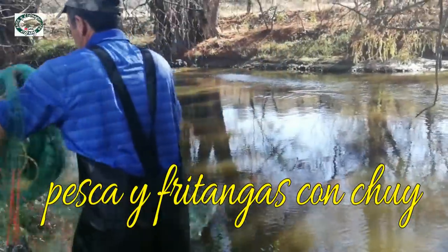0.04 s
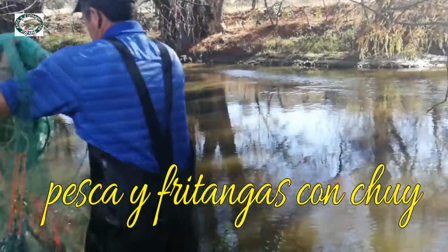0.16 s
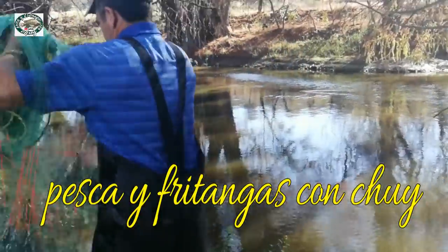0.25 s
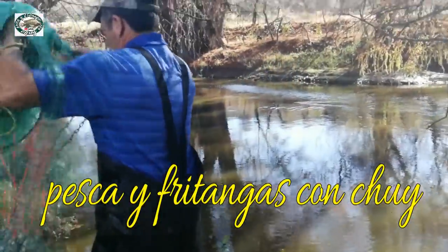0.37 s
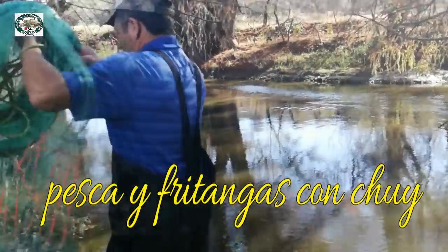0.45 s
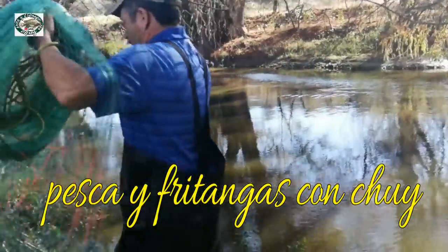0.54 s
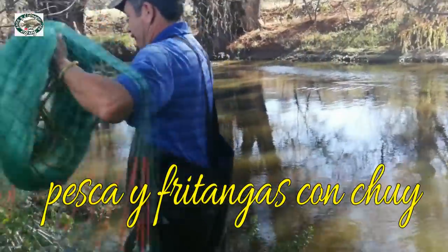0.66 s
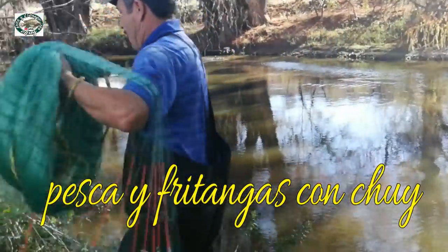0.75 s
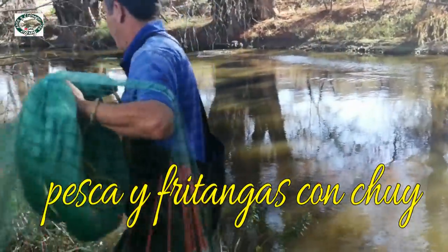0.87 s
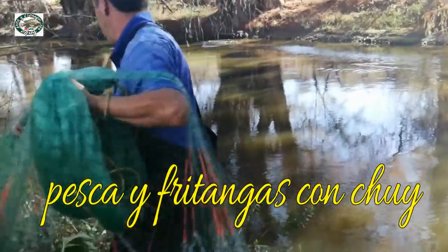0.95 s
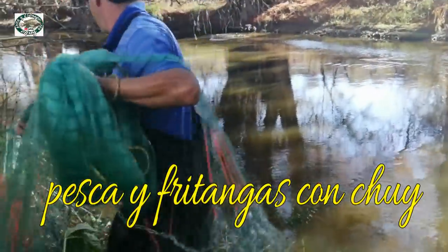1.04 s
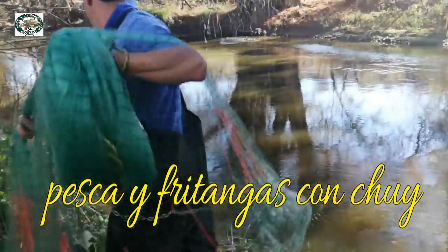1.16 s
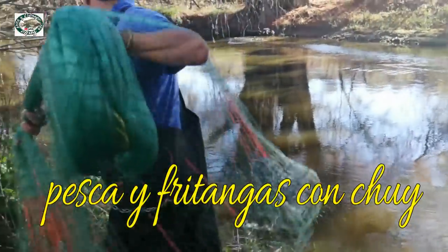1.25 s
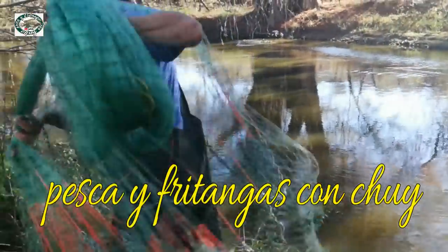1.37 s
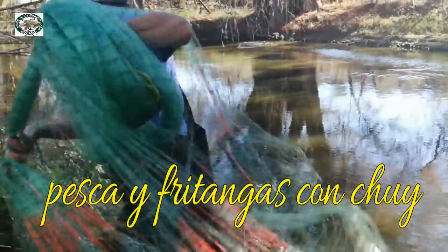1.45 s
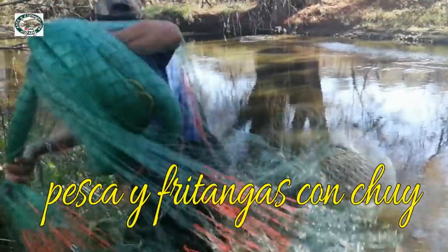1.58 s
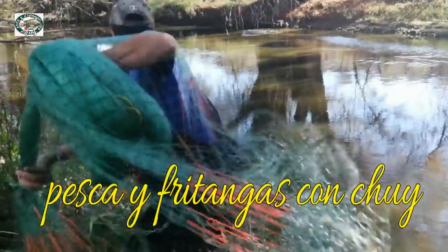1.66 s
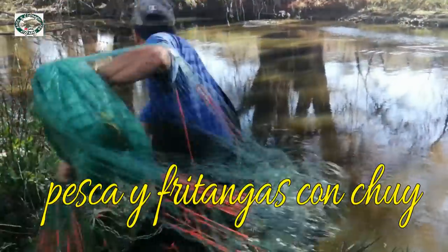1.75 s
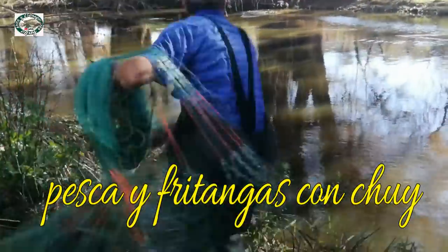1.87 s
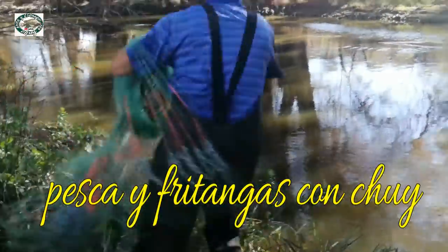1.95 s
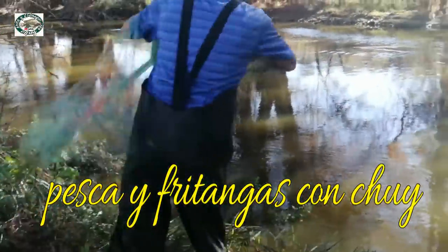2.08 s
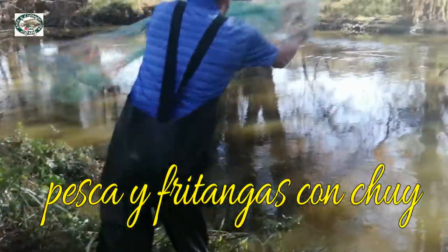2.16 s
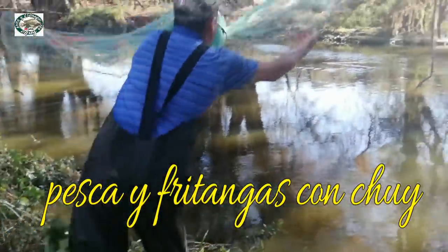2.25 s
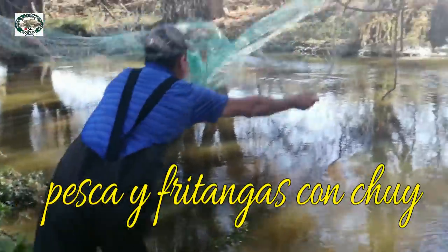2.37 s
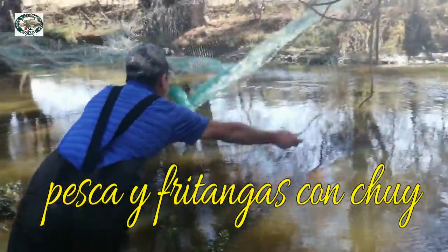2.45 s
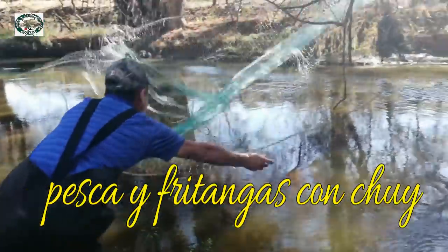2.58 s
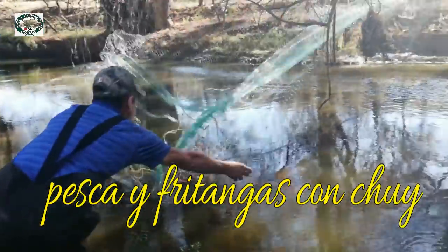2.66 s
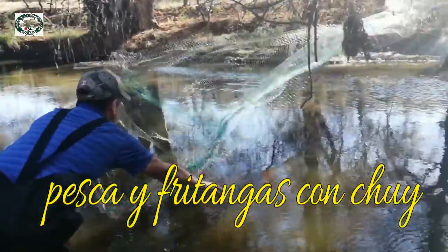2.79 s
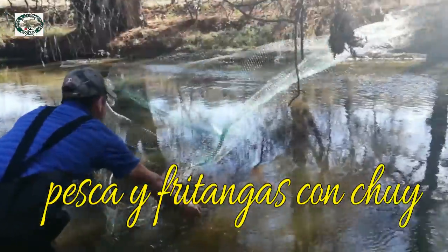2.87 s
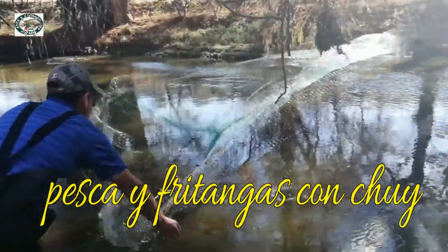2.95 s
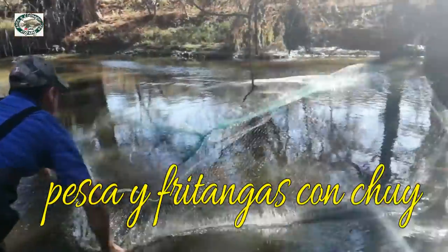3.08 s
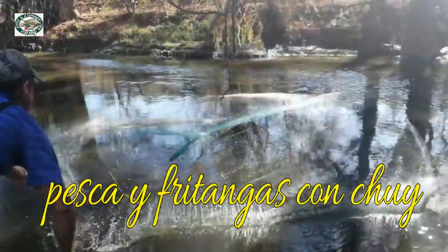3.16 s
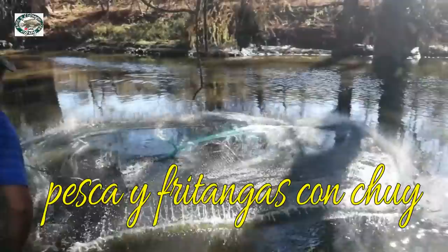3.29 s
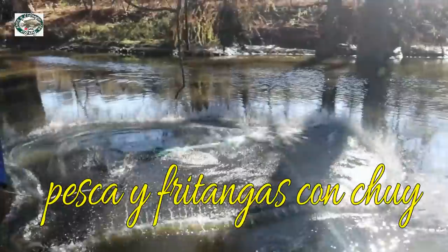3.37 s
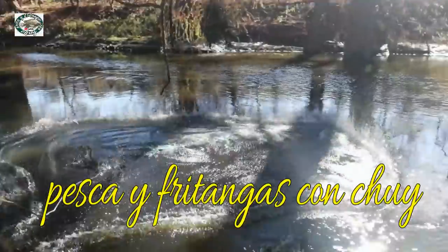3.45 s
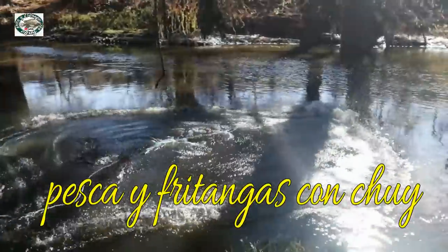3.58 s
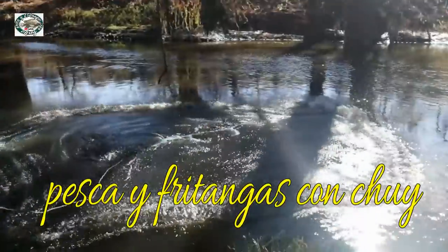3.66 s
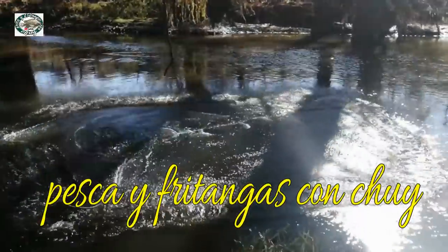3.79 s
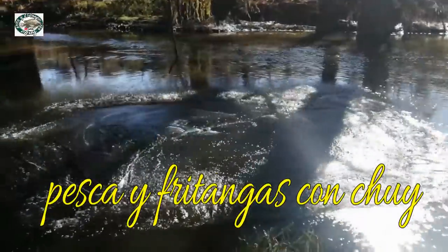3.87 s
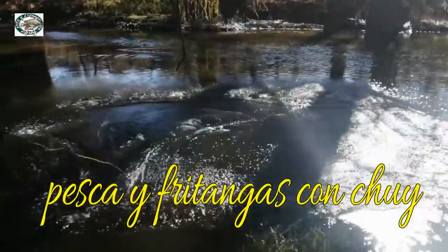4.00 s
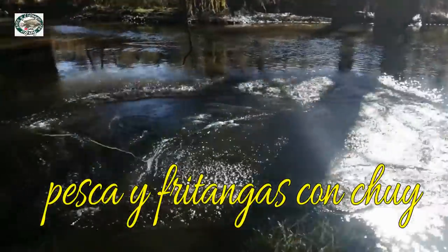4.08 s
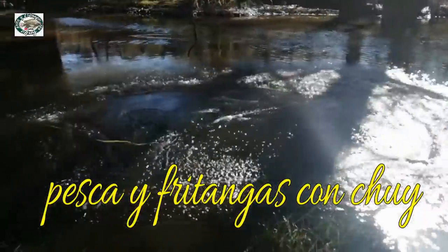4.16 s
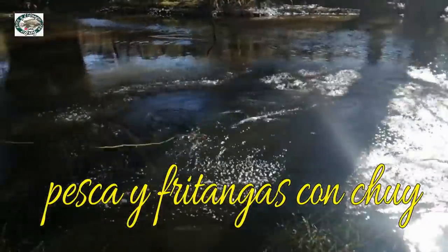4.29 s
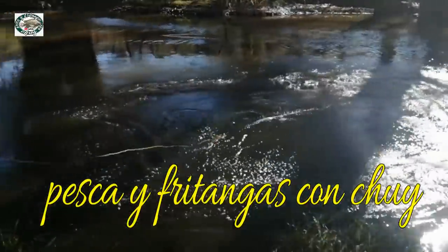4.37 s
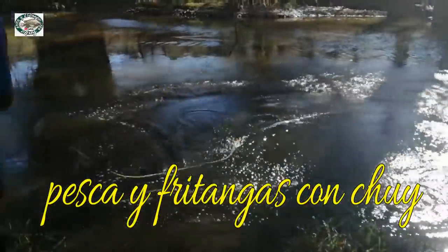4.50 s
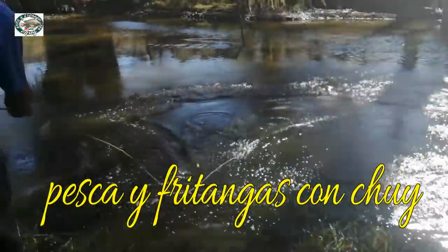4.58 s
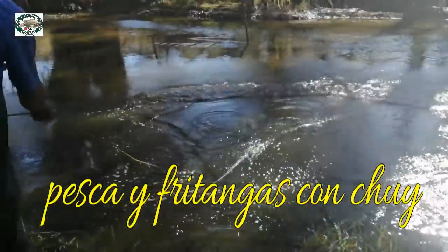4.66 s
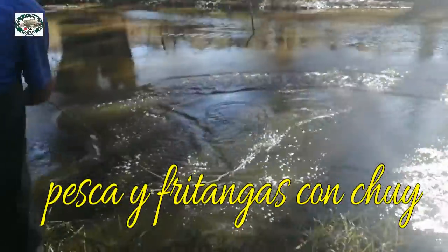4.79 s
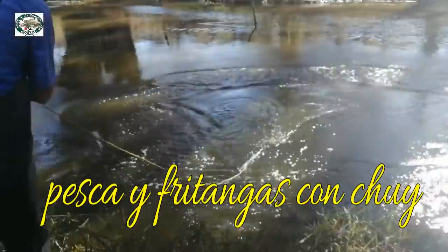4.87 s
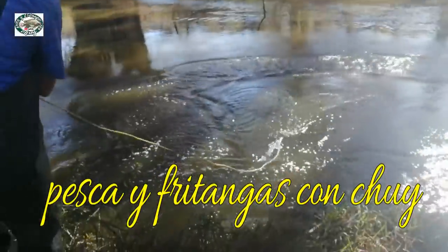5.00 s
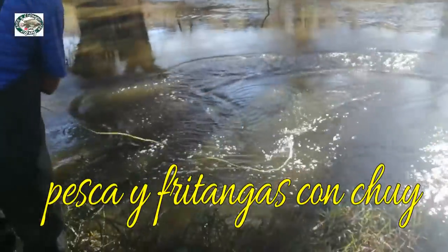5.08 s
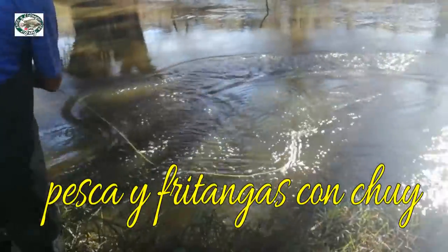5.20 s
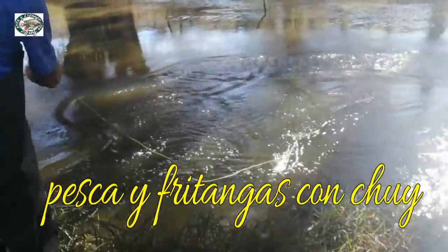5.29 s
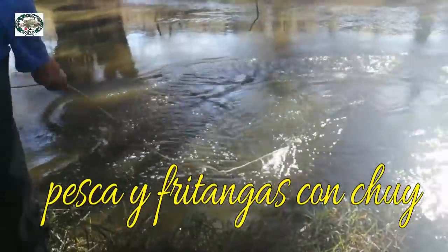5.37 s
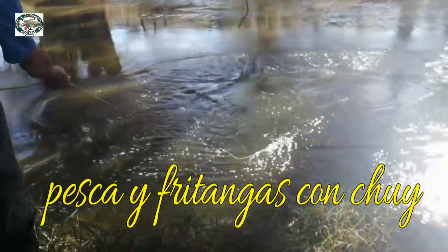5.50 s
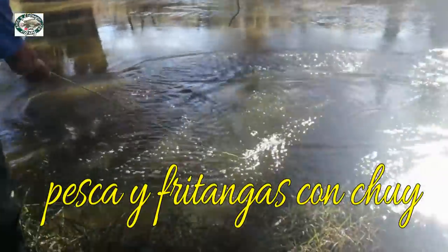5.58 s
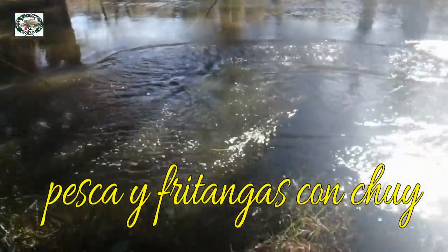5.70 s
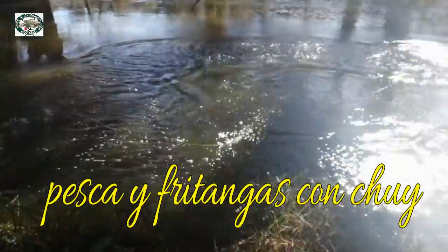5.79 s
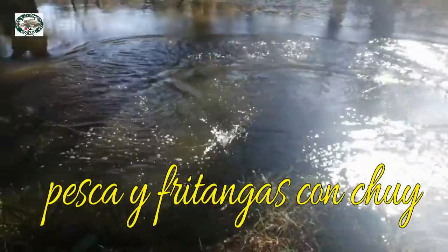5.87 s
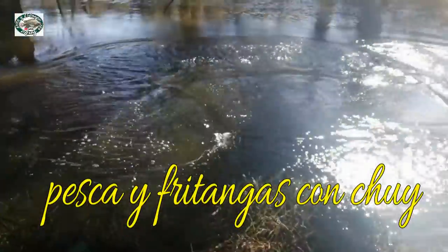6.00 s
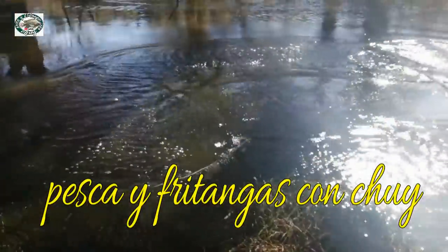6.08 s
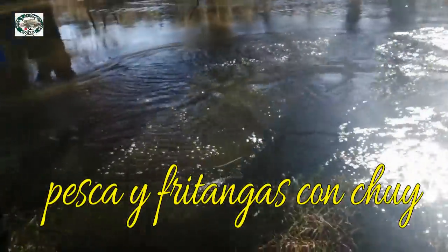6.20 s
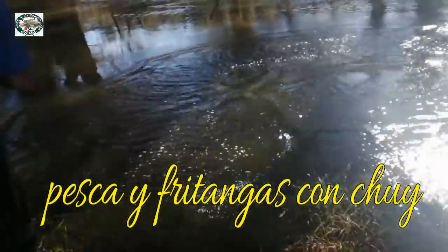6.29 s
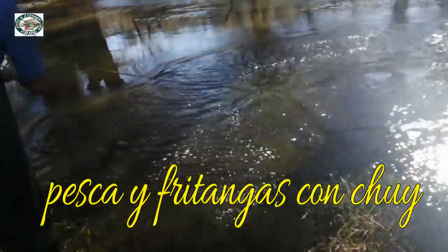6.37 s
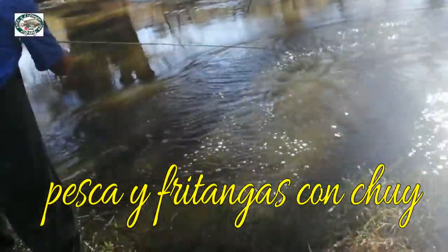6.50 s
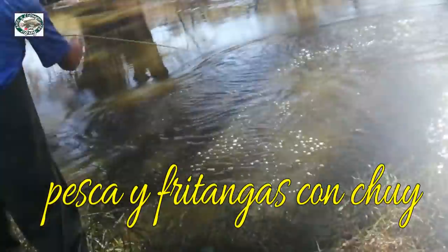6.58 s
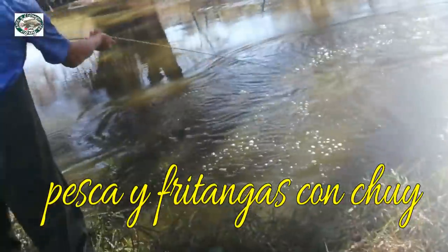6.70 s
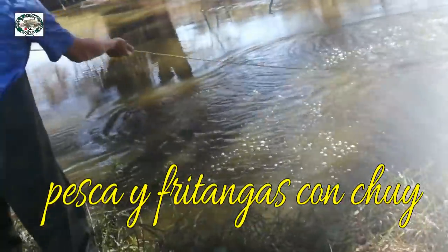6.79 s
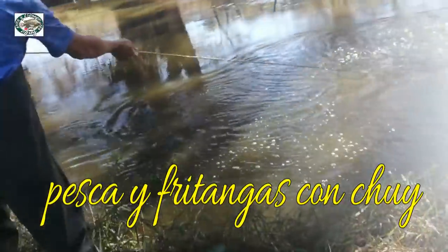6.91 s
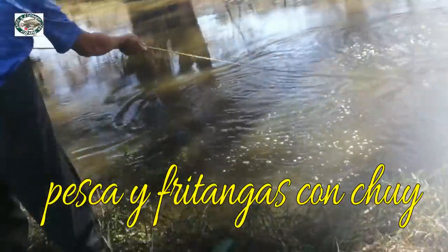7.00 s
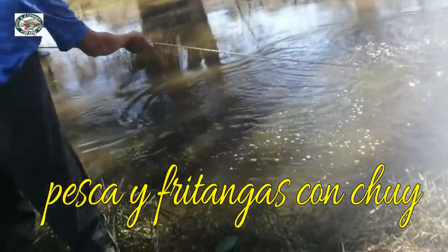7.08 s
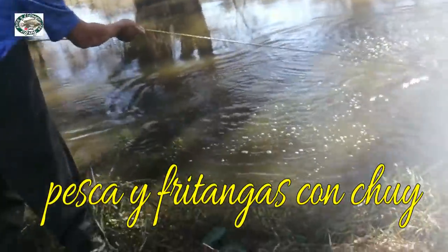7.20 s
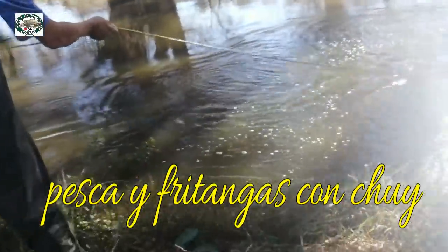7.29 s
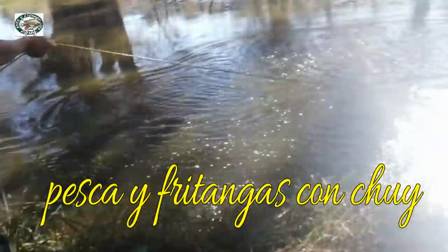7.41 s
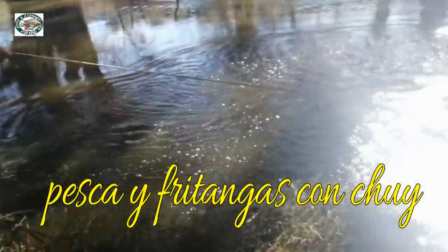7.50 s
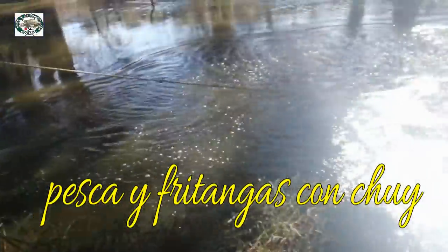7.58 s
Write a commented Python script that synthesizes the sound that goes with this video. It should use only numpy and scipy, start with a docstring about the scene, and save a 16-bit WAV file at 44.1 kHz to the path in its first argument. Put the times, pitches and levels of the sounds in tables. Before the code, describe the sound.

Mesh and cloth rub in bursts with sharp sinker ticks, then a wide fizzing splash lands on water, followed by faint rustles and drips.

```python
"""A cast net is gathered, swung and thrown from a river bank by a fisherman, who then draws in the hand line.
Mesh, grass and cloth are shaped noise impulses under gains for each movement; contacts are damped ticks.
The flying net is a gliding noise band; its landing is a cloud of damped bubbles with spray and deep plunges.
Single bumps, bubbles and drips are short damped sounds; river and far drone are steadily wavering filtered noise."""
import sys
import numpy as np
from scipy import signal
from scipy.fft import rfft, irfft, next_fast_len
from scipy.io import wavfile
from scipy.ndimage import uniform_filter1d

SR = 44100
rng = np.random.default_rng(int(sys.argv[2]) if len(sys.argv) > 2 else 0)


def transcribe(signal):
    """Save signal, clipped to [-1, 1], as a 16-bit WAV file at the path in sys.argv[1]."""
    frames = np.atleast_2d(signal).T
    limited = np.clip(frames, -1, 1)
    pcm = np.round(limited * 32767).astype(np.int16)
    wavfile.write(sys.argv[1], SR, pcm)


N = 337365
TIME = np.arange(N) / SR
STROKE_DEPTH_DB = 20  # the fade that every rise and fall time refers to
LANDING_S = 2.992


def undb(db):
    """Logarithmic level: 20 dB are a factor of ten in amplitude."""
    return 10 ** (np.asarray(db) / 20)


def unit(x):
    """Normalisation: scale to a root mean square of 1."""
    return x / np.sqrt(np.mean(x ** 2))


def pan(db):
    """Level difference between the ears: left and right gains of equal total power."""
    return unit(undb(np.array([[db], [-db]]) / 2))


def add(out, s, x):
    """Superposition: mix a short sound in at time s."""
    i = max(int(s * SR), 0)
    out[:, i:i + x.shape[1]] += x[:, :max(N - i, 0)]


def colour(x, points):
    """Spectral shaping: weight each frequency by a (Hz, dB) curve, interpolated over log frequency."""
    hz, db = np.transpose(points)
    size = next_fast_len(N)
    f = np.maximum(np.arange(size // 2 + 1) * SR / size, 1)
    gain = undb(np.interp(np.log(f), np.log(hz), db))
    return irfft(rfft(x, size) * gain, size)[..., :N]


def band(x, hz, octaves):
    """Resonance: a gentle band-pass, its edges kept within the audible range."""
    half_width = 2 ** (octaves / 2)
    edges = np.clip([hz / half_width, hz * half_width], 10, [.4 * SR, .45 * SR])
    return signal.sosfilt(signal.butter(1, edges, "band", fs=SR, output="sos"), x)


def walk(rate):
    """Random modulation: smoothed steps at a rate in Hz, with rms 1."""
    k = int(SR / rate)
    steps = np.repeat(rng.standard_normal(N // k + 1), k)
    return unit(uniform_filter1d(steps, k)[:N])


def impacts(rate, spread_db, lag_s, scatter_s):
    """Shot noise: random impulses of uneven size, each reaching the two channels at its own lag."""
    chance = rng.standard_normal((int(rate * N / SR), 3))
    at = rng.integers(0, N, len(chance))
    size = np.sign(chance[:, 0]) * undb(spread_db * np.minimum(chance[:, 1], 2.5))
    lag = ((lag_s + scatter_s * chance[:, 2]) * SR).astype(int)
    return np.array([np.bincount((at + lag) % N, size, N), np.bincount(at, size, N)])


def smear(x, decay_s, tail_db):
    """Exponential decay: give every impulse its own short noisy tail."""
    keep = np.exp(-2 / (decay_s * SR))
    energy = signal.lfilter([1 - keep], [1, -keep], x ** 2 + 1e-18)
    return x + undb(tail_db) * np.sqrt(energy) * rng.standard_normal(x.shape)


def shift(x, low_hz, high_hz, rate, depth_db, count):
    """Spectral fluctuation: each band swells and sinks on its own."""
    centres = np.geomspace(low_hz, high_hz, count)
    octaves = np.log2(centres[1] / centres[0])
    return x + sum(band(x, hz, octaves) * (undb(depth_db * np.clip(walk(rate), -2, 2)) - 1)
                   for hz in centres)


def reflect(x, decay_s, wet_db):
    """Diffuse reflection: add a decaying noise tail, different on each side."""
    t = TIME[:SR // 2]
    tail = rng.standard_normal((2, len(t))) * np.exp(-t / decay_s)
    tail /= np.sqrt(np.sum(tail ** 2, axis=1, keepdims=True))
    return x + undb(wet_db) * signal.fftconvolve(x, tail, axes=1)[:, :N]


def stroke(peak_s, rise_s, fall_s):
    """Friction grows with speed: the gain of one movement that gathers speed, peaks and slows."""
    roundness = 1.406  # 1 = pointed peak, 2 = bell
    away = np.maximum((peak_s - TIME) / rise_s, (TIME - peak_s) / fall_s)
    return undb(-STROKE_DEPTH_DB * np.minimum(away, 10) ** roundness)


# Movements of arms, net and boots: gathering, lifting, back swing, throw, stepping back, taking up the line,
# pulling the net, hauling. Each row: peak in seconds, rise and fall in seconds to fade by STROKE_DEPTH_DB,
# coarse rubbing in dB, fine hiss of mesh and grass in dB, flapping of cloth in dB.
MOVEMENTS = [(0.03, 0.21, .26, -53.5, -54, -64), (0.355, .035, .14, -50.5, -55, -53),
             (0.74, 0.2, 0.3, -57, -61.5, -62.5), (1.305, 0.2, 0.11, -39.5, -45, -52),
             (1.36, .28, 0.13, -49.5, -43.5, -73), (1.45, 0.072, 0.11, -43.5, -44, -57.5),
             (1.659, 0.07, 0.061, -63, -42, -45), (1.8, 0.17, 0.23, -52.5, -48.5, -53),
             (1.98, 0.11, 0.23, -33, -40.5, -46), (2.06, 0.15, 0.18, -43, -42.5, -39.5),
             (2.33, 0.31, 0.18, -55.5, -56, -56.5), (2.62, 0.45, .11, -59, -51.5, -68.5),
             (3.985, 0.079, 0.054, -43.5, -38.5, -53.5), (4.48, 0.17, 0.19, -58, -43.5, -53.5),
             (4.68, 0.31, 0.095, -59.5, -47.5, -65), (4.92, 0.74, 1, -81, -59.5, -76),
             (5.52, 0.28, 0.14, -55.5, -53, -62.5), (5.82, 0.17, 0.36, -56, -56, -63),
             (6.23, 0.24, 0.2, -50.5, -66, -68), (6.33, 0.24, 0.27, -44.5, -44, -54.5),
             (6.47, 0.14, 0.14, -52.5, -48, -62), (6.684, 0.045, 0.018, -66, -50.5, -66),
             (6.93, 0.37, .26, -81, -62.5, -81), (7.186, 0.059, 0.07, -50, -45, -68)]
# The faint rustle between movements. The row: rubbing in dB, hiss in dB, flapping in dB.
RESTING_DB = (-62.5, -67, -74.5)
REST_END_S, REST_FADE_S = 6.95, 1.0  # from the end on, down by STROKE_DEPTH_DB per fade time
STILL_S, STILL_LENGTH_S = 3.52, 0.66  # he holds still: the resting rustle dips to nothing
FLAP_BRIEFNESS = 1.19  # flapping fades faster than rubbing on both sides of a peak


def effort():
    """Incoherent sources add in power: gains of rubbing, hiss and flapping over the resting rustle."""
    resting = undb(-STROKE_DEPTH_DB * np.maximum(TIME - REST_END_S, 0) / REST_FADE_S)
    resting *= 1 - np.exp(-((TIME - STILL_S) / STILL_LENGTH_S) ** 4)
    power = np.outer(undb(RESTING_DB), resting) ** 2
    for peak_s, rise_s, fall_s, rub_db, hiss_db, flap_db in MOVEMENTS:
        speed = stroke(peak_s, rise_s, fall_s)
        flapping = undb(flap_db) * speed ** FLAP_BRIEFNESS
        power += np.array([undb(rub_db) * speed, undb(hiss_db) * speed, flapping]) ** 2
    return np.sqrt(power)


# Spectra of coarse rubbing, fine hiss and flapping cloth. Each row: frequency in Hz, relative gain in dB.
RUB_SPECTRUM = [(300, -13), (600, -15), (880, -3), (1200, -4), (1500, -4), (1950, -0.5), (2550, -1.5),
                (3300, -4.5), (4500, -7.5), (7000, -12.5), (12000, -44)]
HISS_SPECTRUM = [(1200, -65), (2500, 2.5), (3500, -2.2), (5500, 1.5), (6500, -3), (7500, 1), (8700, -4),
                 (10800, 3), (12500, -5), (15000, -13)]
FLAP_SPECTRUM = [(40, -7), (90, -3), (200, 1.5), (290, 0), (360, -0.5), (520, -16.5), (900, -11.5),
                 (1300, -35), (2500, -51)]


def handling():
    """Stick-slip friction: countless tiny slips of knots and blades in uneven surges, over fluttering cloth."""
    rub_gain, hiss_gain, flap_gain = effort()
    rub_slips = impacts(rate=2200, spread_db=6.0, lag_s=.00027, scatter_s=.00008)
    rub = colour(smear(rub_slips, decay_s=.0066, tail_db=2.0), RUB_SPECTRUM)
    rub = shift(rub, 900, 3600, rate=25, depth_db=2.5, count=5)
    hiss_slips = impacts(rate=2500, spread_db=5.5, lag_s=.0002, scatter_s=.00034)
    hiss = colour(smear(hiss_slips, decay_s=.0072, tail_db=6.5), HISS_SPECTRUM)
    flaps = impacts(rate=300, spread_db=4.5, lag_s=.00005, scatter_s=.0004)
    flap = colour(smear(flaps, decay_s=.014, tail_db=-10), FLAP_SPECTRUM)
    friction = unit(rub) * rub_gain * pan(1.6) + unit(hiss) * hiss_gain * pan(0.24)
    surges = undb(1.0 * walk(45))
    return friction * surges + unit(flap) * flap_gain


# Spectrum of the river. Each row: frequency in Hz, relative gain in dB.
RIVER_SPECTRUM = [(20, -1.5), (80, -2.5), (120, -9), (200, -14), (320, -22.5), (520, -26), (900, -30.5),
                  (1400, -22.5), (2100, -18), (3500, -24), (7000, -29.5), (11000, -30), (15000, -45)]
RIVER_DB = -61.5


def river():
    """Coherence: a low outdoor rumble common to both sides, and a thin wavering wash independent on each."""
    common, apart = rng.standard_normal(N), rng.standard_normal((2, N))
    bass = signal.sosfilt(signal.butter(1, 450, fs=SR, output="sos"), common)
    wash = signal.sosfilt(signal.butter(1, 450, "high", fs=SR, output="sos"), apart)
    wavering = bass * undb(0.92 * walk(8.2)) + wash * undb(2.6 * walk(9))
    return undb(RIVER_DB) * unit(colour(wavering, RIVER_SPECTRUM))


# A faint low drone from far away. Each row: time in seconds, level in dB.
DRONE_LEVEL = [(0, -72), (5.0, -71), (5.5, -63), (6.5, -61), (7.6, -74)]


def drone():
    """Narrow-band noise beats at random: a wavering hum at 79.7 Hz that carries over the water."""
    hum = band(band(rng.standard_normal(N), 79.7, 0.12), 79.7, 0.12)
    s, db = np.transpose(DRONE_LEVEL)
    return unit(hum) * undb(np.interp(TIME, s, db))


# Sinkers clacking, dry stalks snapping, and the net's first tick on the water.
# Each row: start in seconds, tick level in dB over its first 6 ms, centre in Hz, width in octaves,
# decay in seconds, left minus right in dB, relative knock level in dB.
CONTACTS = [(0.124, -41, 1900.0, 4.2, 0.00033, 16, -37.5), (0.1416, -36, 8100.0, 0.8, 0.0065, 1, -51),
            (0.298, -46, 4970, 0.5, 0.003, 7, -64), (0.3344, -46, 2400.0, 1.9, 0.0019, 4, -49),
            (1.249, -35, 2800.0, 3.9, 0.0049, 1, -40), (1.3812, -33.5, 8300.0, 1.9, 0.0037, -6, -43.5),
            (1.4141, -31.5, 5100.0, 2.1, 0.0025, -1, -59), (1.5862, -30, 3600, 0.72, 0.0059, -1, -44.5),
            (1.596, -24, 3700, 1.1, 0.0019, -0.5, -60), (1.7578, -41, 3400.0, 0.77, 0.0012, 1.0, -63),
            (1.7676, -37.0, 3700.0, 2.2, 0.0012, 1, -53), (1.799, -42, 2800.0, 1.5, 0.0015, -2, -58),
            (1.8257, -30, 5200, 0.7, 0.0012, -2, -52), (1.8271, -25.5, 3650, 0.45, 0.0011, 3, -39.5),
            (1.8774, -37, 4650, 4.3, 0.0016, 2, -48), (1.9213, -31, 4630, 3.6, 0.0069, -2, -39),
            (2.1956, -29.5, 8240, 0.95, 0.0016, 0, -62), (2.4024, -41.5, 4400.0, 3.6, 0.0032, 5, -70),
            (2.996, -44, 3000, 1.3, .006, 2, -75), (3.9923, -33.5, 9600, 2.2, 0.0022, -5, -61),
            (4.265, -55, 6000, 1.6, .003, -5, -78), (5.2212, -53, 9300, 0.59, 0.0015, -4, -85),
            (5.82, -37.5, 7200.0, 2.8, 0.0012, 0, -70), (6.2827, -35.5, 5600.0, 2.1, 0.0033, 2, -59),
            (6.3474, -21.5, 3500, 3.0, 0.0034, -1, -41), (6.55, -32, 2400, 0.45, 0.002, -1.5, -49),
            (6.567, -48, 2200, 0.7, 0.009, 0, -64), (6.605, -49, 6000, 2.2, 0.002, -2, -72),
            (6.743, -51, 5500, 1.7, .0015, -4, -76), (6.7576, -42.5, 5100, 1.4, 0.0032, -2, -76),
            (6.801, -44, 5560, 1.2, 0.013, -1, -74.0), (6.8377, -46.5, 4200.0, 1.3, 0.0019, -3, -69),
            (7.0791, -46, 3500.0, 3.6, 0.0048, 4, -54.5), (7.138, -31, 8100, 0.99, 0.0078, 1, -48),
            (7.185, -39, 4500.0, 2.5, 0.0012, 5, -68), (7.314, -52, 3300.0, 0.97, 0.0011, 0, -80),
            (7.338, -45.5, 3480, 1.4, 0.0025, 1, -57.5)]
# Spectrum of the knock. Each row: frequency in Hz, relative gain in dB.
KNOCK_SPECTRUM = [(60, -17), (150, 1), (300, 4), (550, -7.5), (1100, 4), (1900, 2.5), (4500, -46)]


def clicks():
    """Impact excitation: a sharp tick and rattle in a contact's own resonance, over a short push or knock."""
    ticks, knocks, t = np.zeros((2, N)), np.zeros((2, N)), TIME[:SR // 10]
    highpass = signal.butter(2, 1200, "high", fs=SR, output="sos")
    for s, db, hz, octaves, decay_s, pan_db, knock_db in CONTACTS:
        decay = np.exp(-t / decay_s) + undb(-9) * np.exp(-t / .009)  # a weaker second decay is added
        rattle = rng.standard_normal((2, len(t))) * decay
        rattle[:, 2] += 4.5  # one sharp spike at the very start
        ring = signal.sosfilt(highpass, band(rattle, hz, octaves))
        ring /= np.sqrt(np.mean(ring[:, :int(.006 * SR)] ** 2))
        add(ticks, s, undb(db) * ring * pan(pan_db))
        add(knocks, s, undb(knock_db) * pan(pan_db / 2))  # a single impulse
    knocks = undb(31.5) * colour(smear(knocks, decay_s=.0022, tail_db=2.5), KNOCK_SPECTRUM)
    return reflect(ticks + knocks, decay_s=.044, wet_db=-15.0)


# Dull bumps of boots and cloth, and gulps of water.
# Each row: start in seconds, peak in dB before reflections, pitch in Hz, decay in seconds.
BUMPS = [(.139, -37, 90, 0.006), (0.829, -50, 260, 0.0052), (1.503, -40.5, 320, 0.0064),
         (1.564, -37.5, 318, 0.0041), (1.659, -35, 250, 0.007), (1.694, -43, 310, .006),
         (1.728, -36, 42, 0.015), (2.039, -34, 286, 0.015), (2.073, -35, 280, .008),
         (2.355, -49, 306, 0.0066), (2.49, -48.5, 320, 0.011), (3.089, -40, 274, 0.0078),
         (3.186, -33.5, 286, 0.01), (3.346, -33, 273, 0.022), (3.452, -35, 300, .009),
         (3.642, -31, 294, 0.0041), (4.384, -43, 204, 0.01), (4.526, -44, 255, 0.0072),
         (4.673, -46, 197, 0.0038), (5.478, -51.5, 355, 0.0062), (5.622, -48, 293, 0.0059)]


def thumps():
    """Damped oscillation: soft pushes that swing for a few cycles."""
    out, t = np.zeros((2, N)), TIME[:SR // 4]
    for s, db, hz, decay_s in BUMPS:
        swing = np.sin(2 * np.pi * hz * t) * (1 - np.exp(-t / .00087)) * np.exp(-t / decay_s)
        add(out, s, undb(db) * swing / np.abs(swing).max() * pan(0))
    return reflect(out, decay_s=.0063, wet_db=-10)


def bubble(hz, decay_s, rise):
    """Volume resonance: a damped air pocket whose pitch climbs as it nears the surface."""
    age = TIME[:int(6 * decay_s * SR)] / decay_s
    return np.sin(2 * np.pi * np.cumsum(hz * (1 + rise * age)) / SR) * np.exp(-age)


# The rim skims the water on the swing, before the whole net lands.
SKIM_S, SKIM_ATTACK_S, SKIM_HOLD_S, SKIM_FALL_S = 1.588, .016, .065, .025
LAST_BUBBLE_S = 4.5


def bubbles(low_hz, high_hz, rate, cycles, spread_db):
    """Radiation damping: a cloud of bubbles of their own size and place, the small ones dying soonest."""
    length_s = LAST_BUBBLE_S - SKIM_S
    out = np.zeros((2, N))
    for when, pitch, strength, place in rng.random((int(rate * length_s), 4)):
        hz = low_hz * (high_hz / low_hz) ** pitch
        size = hz * undb(spread_db * min(-np.log(1 - strength), 2.5))
        ping = size * bubble(hz, cycles / hz, rise=.032)
        lag = int((.00052 * place - .0001) * SR)  # the ring of the net spreads wide before the listener
        for side, late in enumerate((lag, 0)):
            add(out[side:side + 1], SKIM_S + when * length_s + late / SR, ping[None])
    return out


def swell(start_s, db, delay_s, attack_s, curve, hold_s, fall_s, roundness):
    """Envelope: attack, hold and fall, as a gain."""
    age = TIME - start_s - delay_s
    falling = np.clip((age - attack_s - hold_s) / fall_s, 0, 10)
    return np.clip(age / attack_s, 0, 1) ** curve * undb(db - STROKE_DEPTH_DB * falling ** roundness)


# The skim. The row: relative bubbling, spray and deep plunges, all in dB.
SKIM_LEVELS = (-45, -70, -55)
# How the water answers the landing. Each row: relative level in dB, delay in seconds, attack in seconds,
# attack exponent, hold in seconds, fall in seconds to fade by STROKE_DEPTH_DB, exponent of the fall.
BUBBLE_ENVELOPE = (-29.4, .004, .27, .72, .06, 0.615, 1.85)
SPRAY_ENVELOPE = (-42.3, 0, 0.2369, 0.5, 0.0275, 0.68, 1.5)
PLUNGE_ENVELOPE = (-43.6, 0.17, .17, 0.12, .11, .5, 1.0)


def churn():
    """Energy of entry: gains of bubbling, spray and plunges for a brief skim, then the landing."""
    skim = swell(SKIM_S, 0, 0, SKIM_ATTACK_S, 1, SKIM_HOLD_S, SKIM_FALL_S, 1)
    envelopes = (BUBBLE_ENVELOPE, SPRAY_ENVELOPE, PLUNGE_ENVELOPE)
    return [undb(db) * skim + swell(LANDING_S, *envelope)
            for db, envelope in zip(SKIM_LEVELS, envelopes)]


# Clumps of sinkers that hit the water together, each with its own size of bubbles.
# Each row: peak in seconds, extra gain in dB, centre in Hz, half length in seconds (to 1/e of the lift).
SINKER_CLUMPS = [(3.097, 6, 2100, .012), (3.171, 5, 7000, .012), (3.189, 7, 950, .013),
                 (3.241, 7.5, 2500, .01), (3.345, 5.5, 2500, .028)]
CLUMP_OCTAVES = 1.3


def clumps(water):
    """Selective excitation: each clump of sinkers briefly lifts the water's sound around its own pitch."""
    return water + sum((undb(db) - 1) * np.exp(-((TIME - s) / length_s) ** 2) * band(water, hz, CLUMP_OCTAVES)
                       for s, db, hz, length_s in SINKER_CLUMPS)


# Spectra of the bubble cloud, the spray and the plunges. Each row: frequency in Hz, relative gain in dB.
BUBBLING_SPECTRUM = [(350, -19), (520, -14), (700, -2), (880, 2), (1080, -3), (1400, -5), (1900, 2.5),
                     (2250, -3.5), (2700, 0), (3300, -8.5), (4200, -18), (6500, -30)]
SPRAY_SPECTRUM = [(1500, -8.5), (3500, 4.5), (5400, 0.5), (6500, -2.5), (8700, -6.5), (10800, -5.5),
                  (12500, -12.5), (15000, -21)]
PLUNGE_SPECTRUM = [(80, -14), (130, -14), (180, -6.5), (270, -2.5), (390, 0), (520, -10), (900, -29)]


def splash():
    """Air entrainment: sinkers punch deep cavities, mesh drags bubbles under, spray patters; reflections follow."""
    bubble_gain, spray_gain, plunge_gain = churn()
    fine_bubbles = bubbles(454, 5830, rate=3200, cycles=5.2, spread_db=3.0)
    cloud = unit(colour(fine_bubbles, BUBBLING_SPECTRUM))
    cloud = unit(shift(cloud, 650, 3600, rate=35, depth_db=2.5, count=6))
    drops = impacts(rate=2000, spread_db=5.5, lag_s=.0003, scatter_s=.0002)
    spray = unit(colour(smear(drops, decay_s=.0083, tail_db=2.5), SPRAY_SPECTRUM))
    cavities = bubbles(90, 600, rate=600, cycles=2, spread_db=4.5)
    plunges = unit(colour(cavities, PLUNGE_SPECTRUM))
    under_water = (cloud * bubble_gain + plunges * plunge_gain) * undb(-5.5)
    water = under_water + spray * spray_gain * undb(6.0)
    # short reflections close to the listener, then longer ones
    early_reflections = reflect(clumps(water) * pan(0.63), decay_s=.0036, wet_db=-12)
    return reflect(early_reflections, decay_s=.042, wet_db=-6.5)


# Single large bubbles.
# Each row: start in seconds, level in dB before decay and reflections, starting pitch in Hz, decay in seconds.
LARGE_BUBBLES = [(1.614, -40, 850, .004), (1.631, -39, 1000, .003), (1.659, -33, 950, .003),
                 (3.429, -28, 890, 0.0037), (3.910, -39, 940, 0.0042), (4.111, -53, 1870, .007),
                 (4.178, -55, 770, .007), (4.199, -50, 860, 0.008), (4.223, -51, 1860, .008),
                 (4.672, -50, 760, 0.0029), (5.632, -45.5, 880, 0.0081), (6.811, -58, 876, 0.012)]


def plops():
    """Free vibration: larger bubbles ring out one by one."""
    out = np.zeros((2, N))
    for s, db, hz, decay_s in LARGE_BUBBLES:
        add(out, s, undb(db) * bubble(hz, decay_s, rise=.011) * pan(0))
    return reflect(out, decay_s=.016, wet_db=-4)


# The spreading mesh whistles through the air, fainter and lower as it slows.
RELEASE_S, FLIGHT_DB, FLIGHT_FADE_DB_PER_S = 2.09, -53, 14
FLIGHT_START_HZ, FLIGHT_END_HZ, FLIGHT_OCTAVES = 3300, 2050, 0.55


def flight(count=4):
    """Aeolian tone: air sings in the twine; crossfaded noise bands step down and fade until the net lands."""
    slowed = np.clip((TIME - RELEASE_S) / (LANDING_S - RELEASE_S), 0, 1) * (count - 1)
    song = np.zeros((2, N))
    for k, hz in enumerate(np.geomspace(FLIGHT_START_HZ, FLIGHT_END_HZ, count)):
        whistle = band(band(rng.standard_normal((2, N)), hz, FLIGHT_OCTAVES), hz, FLIGHT_OCTAVES)
        song += unit(whistle) * np.sqrt(np.maximum(1 - np.abs(slowed - k), 0))
    aloft = uniform_filter1d(1. * ((TIME > RELEASE_S) & (TIME < LANDING_S)), SR // 20)
    return song * aloft * undb(FLIGHT_DB - FLIGHT_FADE_DB_PER_S * (TIME - RELEASE_S))


# Drops from the wet line falling on the bank. Each row: start in seconds, onset level in dB, centre in Hz.
LINE_DROPS = [(4.815, -51, 1700), (4.983, -48.5, 1700), (5.257, -50.5, 2500), (6.071, -46, 2400),
              (6.160, -43, 2700)]


def drips():
    """Droplet impact: after the cast the wet line sheds a few clear drops among sparse little ticks."""
    ticks = smear(impacts(rate=28, spread_db=3.5, lag_s=0, scatter_s=.0003), decay_s=.0043, tail_db=5)
    hauling = (TIME > 4.05) & (TIME < 7.35)
    out, t = unit(band(ticks, 2700, 1.5)) * undb(-66) * hauling, TIME[:SR // 20]
    for s, db, hz in LINE_DROPS:
        noise = unit(band(rng.standard_normal((2, len(t))), hz, 1))
        add(out, s, undb(db) * noise * np.exp(-t / .005))
    return out


def scene():
    """Superposition: the fisherman close by, the net in the air and on the water, the river behind."""
    contacts_and_handling = handling() + clicks() + thumps()
    net_and_water = splash() + plops() + flight() + drips()
    return contacts_and_handling + net_and_water + river() + drone()


# The two channels colour the sound differently. Each row: frequency in Hz, left minus right in dB.
CHANNEL_BALANCE = [(200, -0.5), (380, 1), (700, -3.5), (1200, 0), (2400, 0.7), (4400, 1), (8100, -0.5),
                   (11000, -7.5), (15000, -4.5)]
TOP_HZ = 15100


def record(dry):
    """Frequency response: the right channel is brighter than the left in the top treble; the top is cut."""
    channels = []
    for side, x in enumerate(dry):
        response = [(hz, 20 * np.log10(pan(db)[side, 0])) for hz, db in CHANNEL_BALANCE]
        channels.append(colour(x, response))
    return signal.sosfilt(signal.ellip(8, .2, 70, TOP_HZ, fs=SR, output="sos"), channels)


dry = scene()
out = record(dry)
transcribe(out)
```